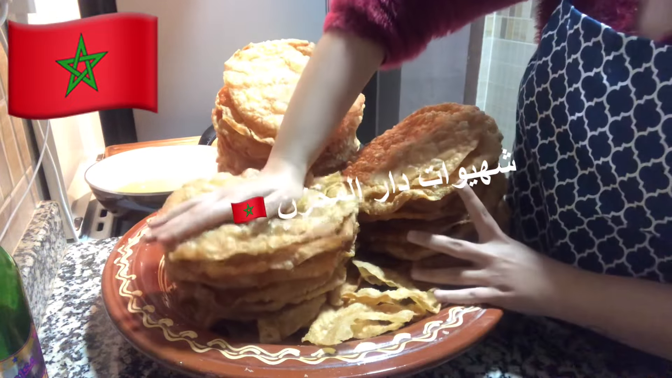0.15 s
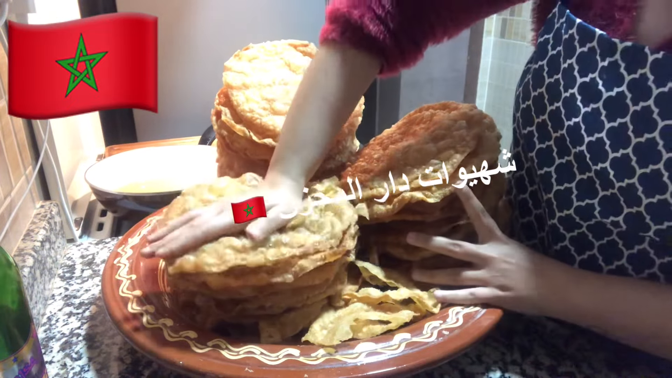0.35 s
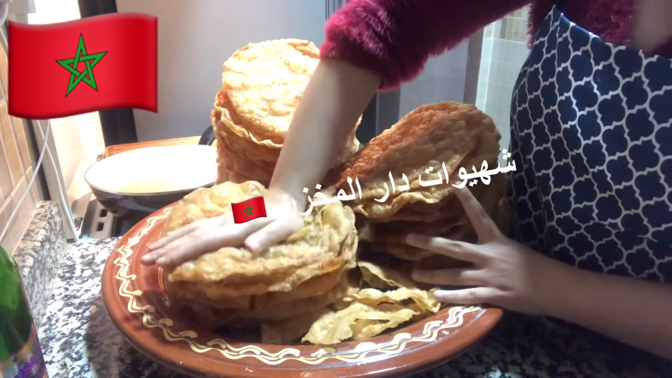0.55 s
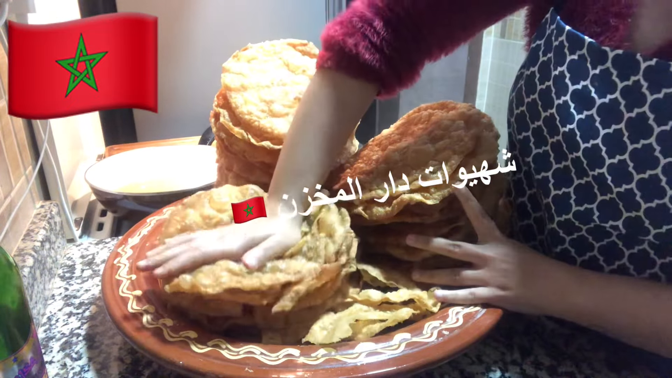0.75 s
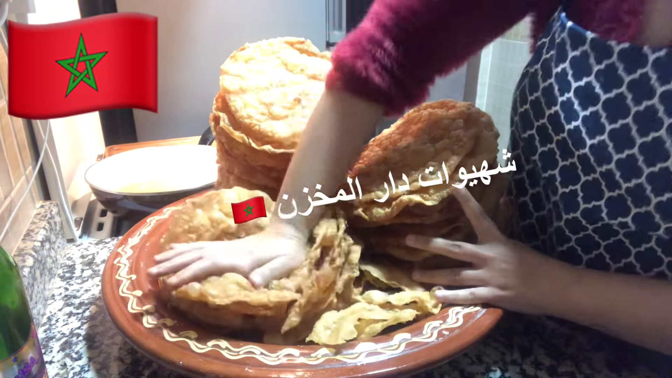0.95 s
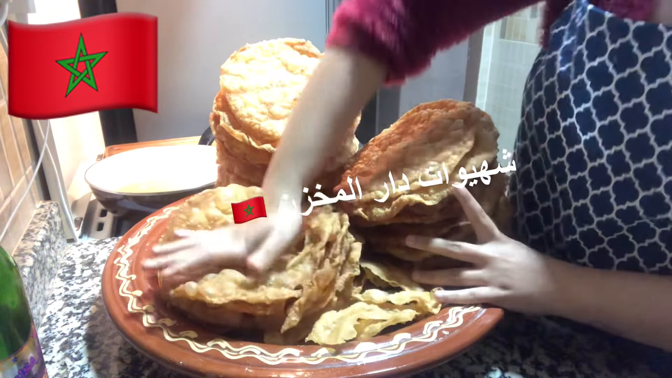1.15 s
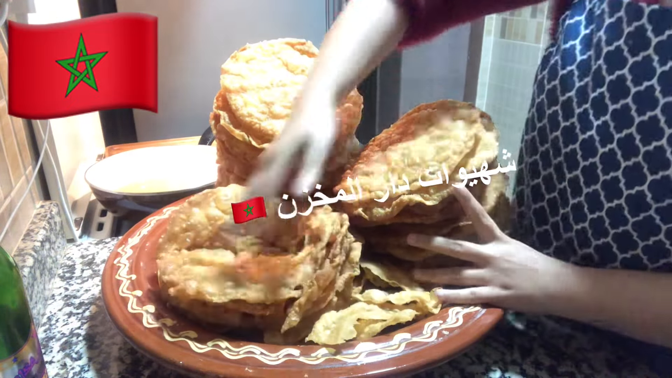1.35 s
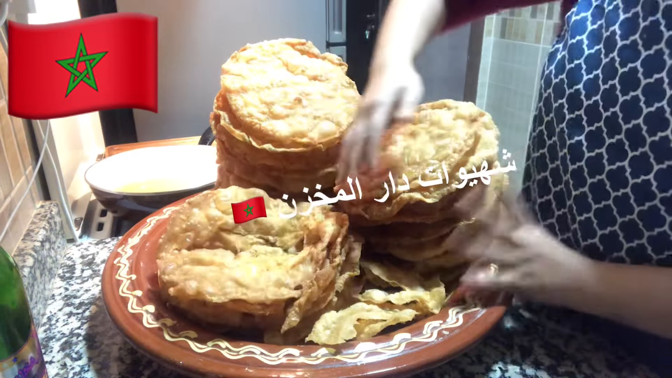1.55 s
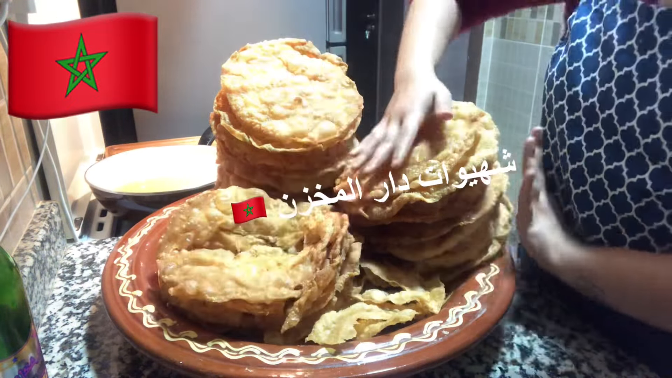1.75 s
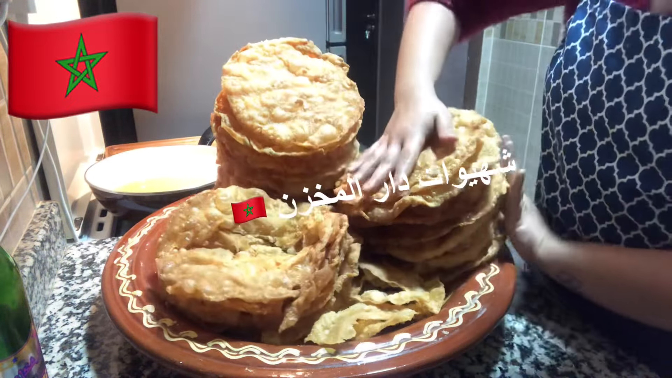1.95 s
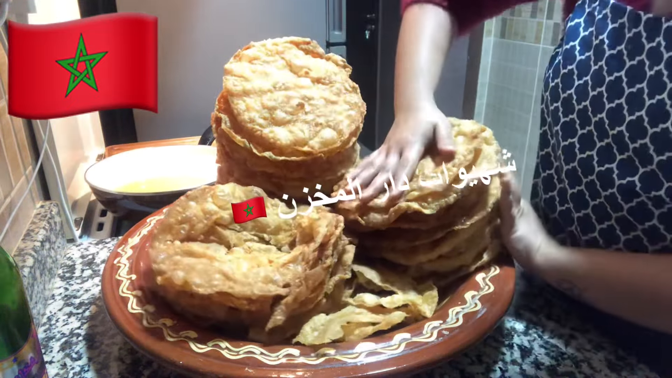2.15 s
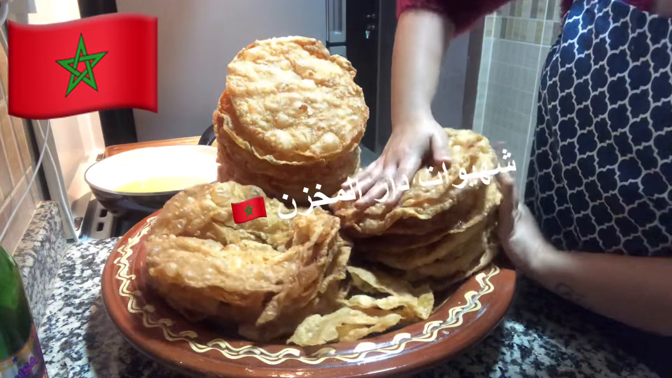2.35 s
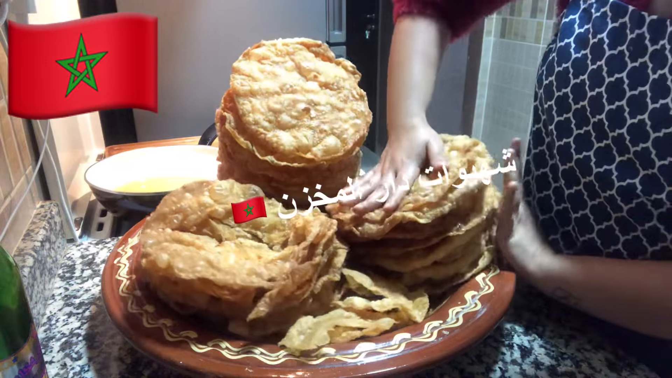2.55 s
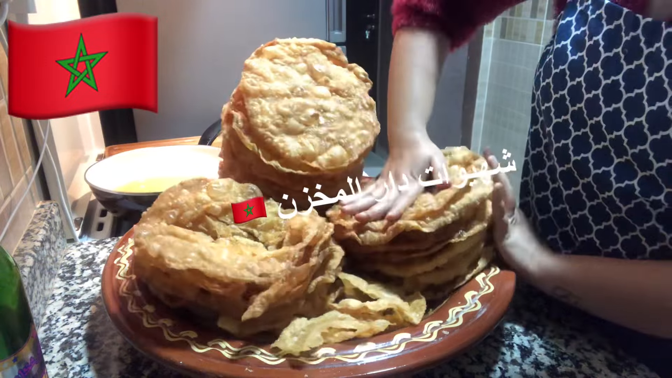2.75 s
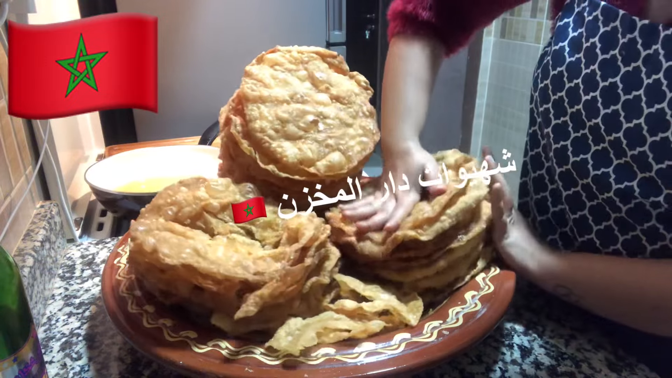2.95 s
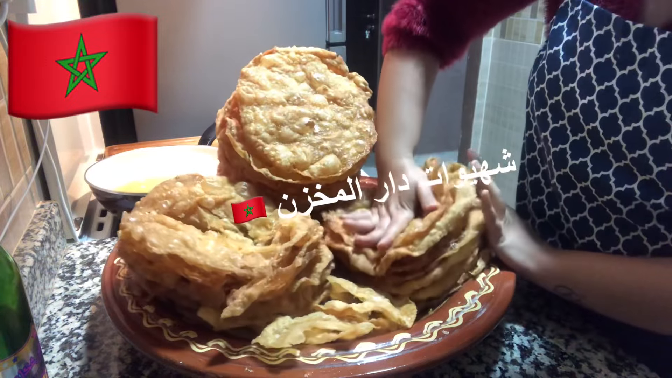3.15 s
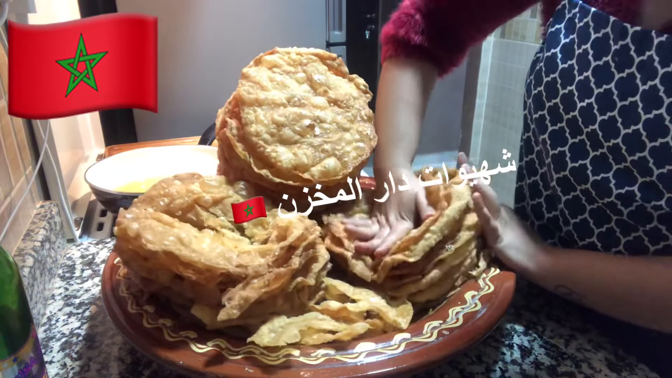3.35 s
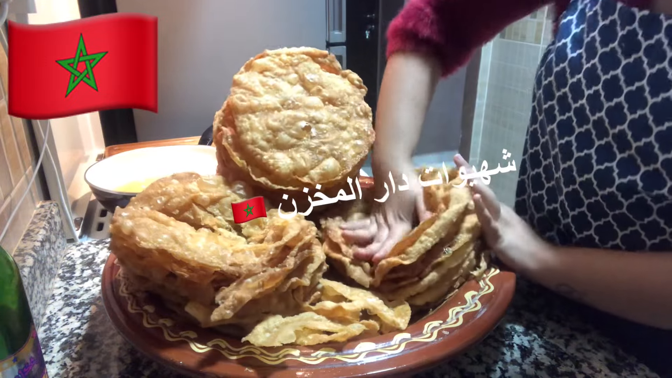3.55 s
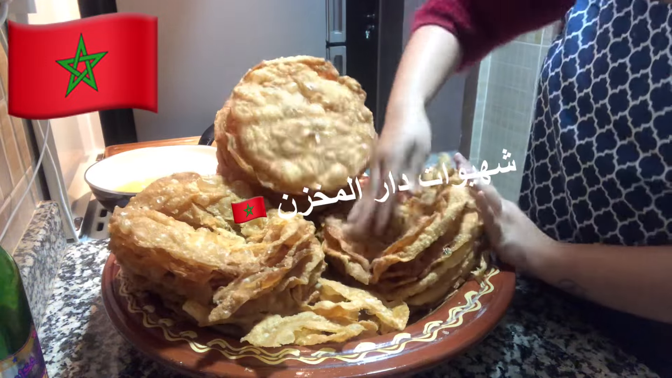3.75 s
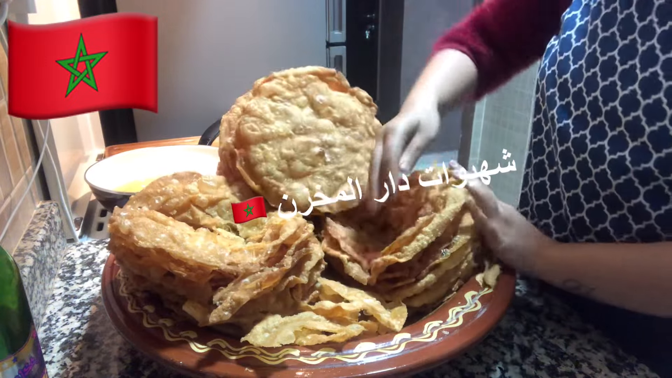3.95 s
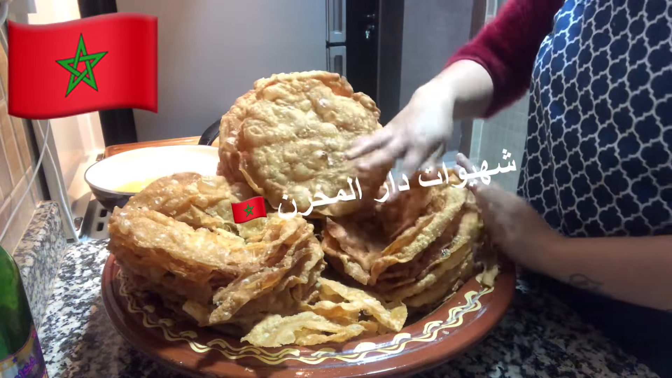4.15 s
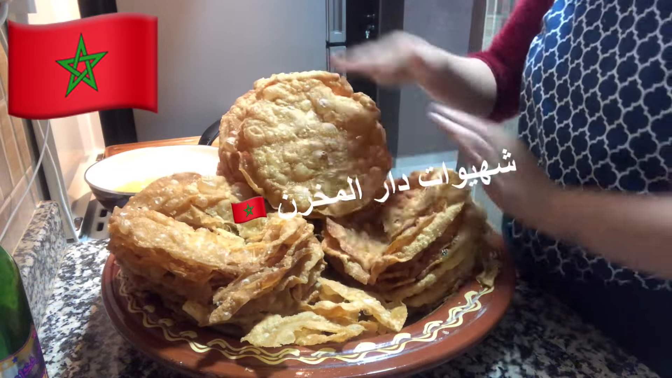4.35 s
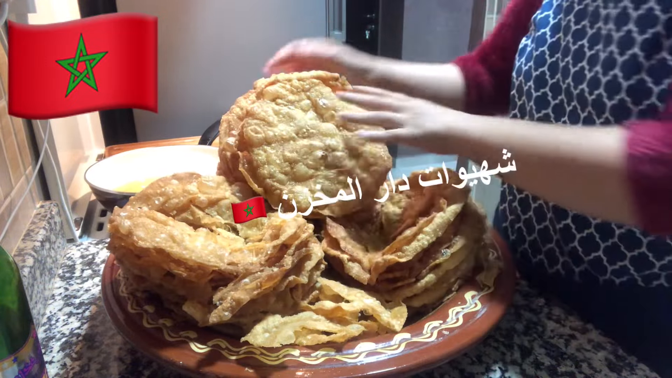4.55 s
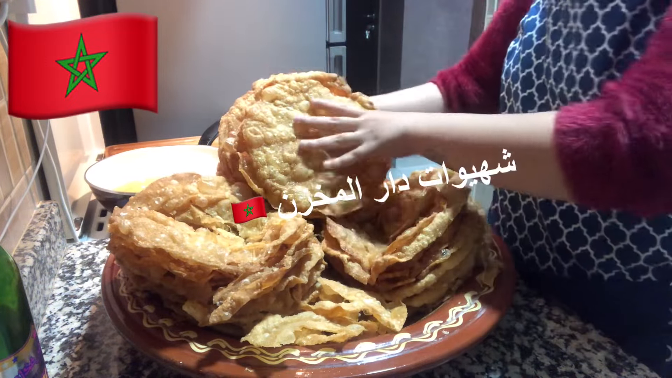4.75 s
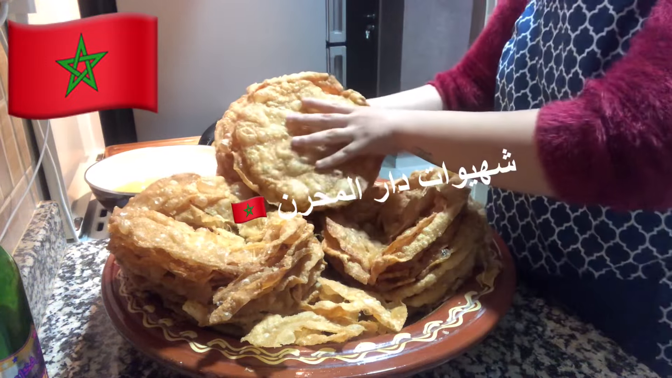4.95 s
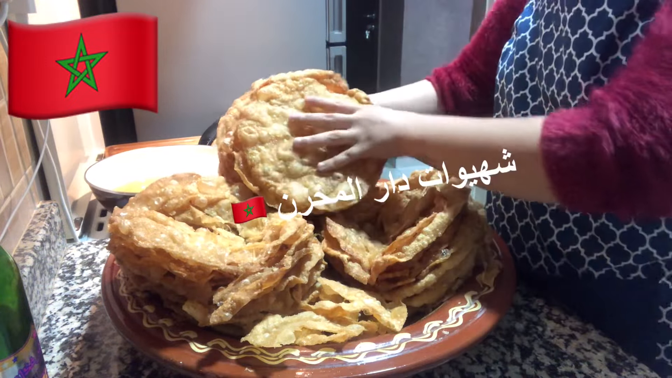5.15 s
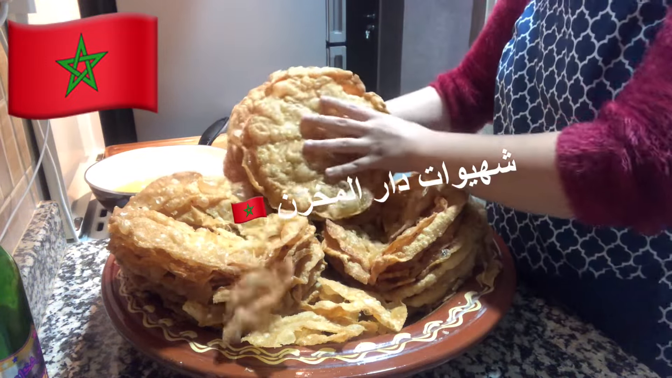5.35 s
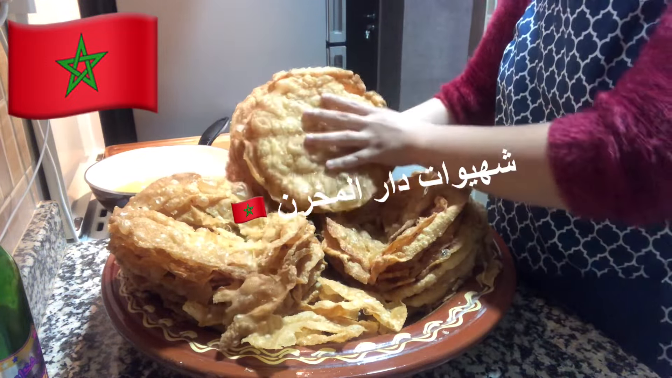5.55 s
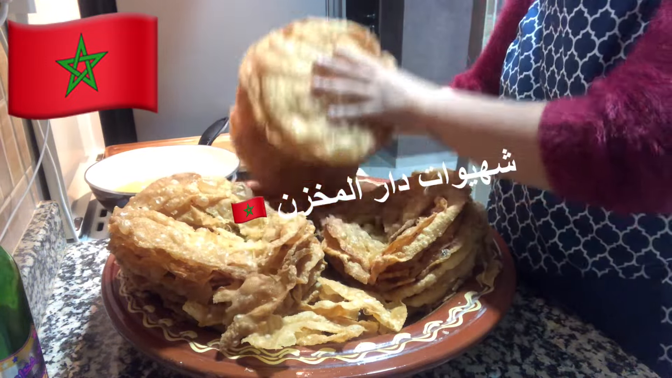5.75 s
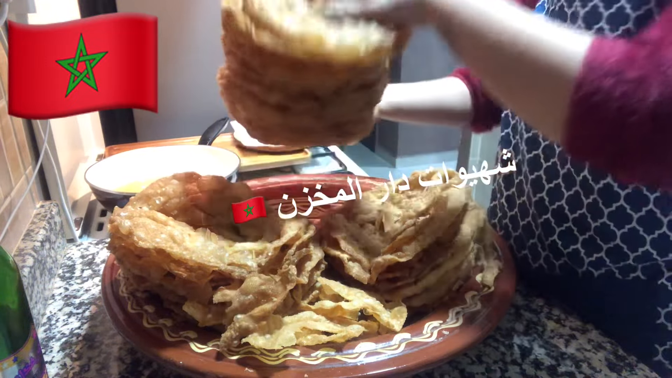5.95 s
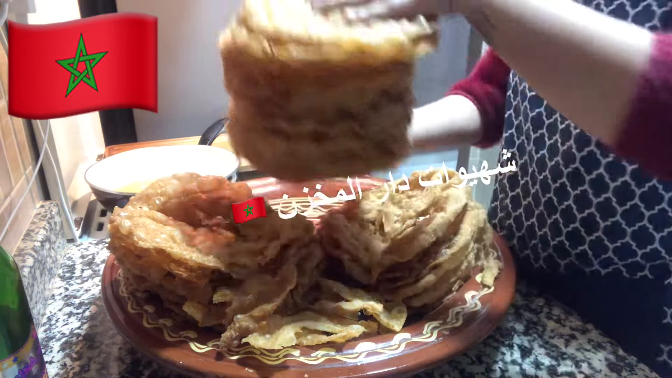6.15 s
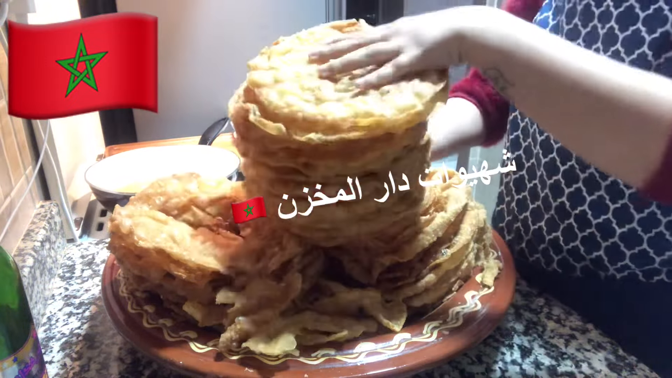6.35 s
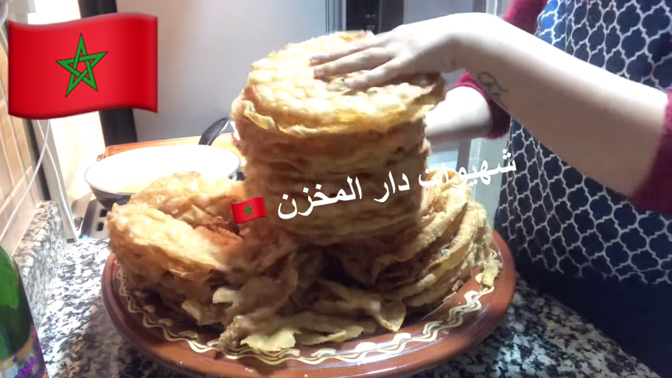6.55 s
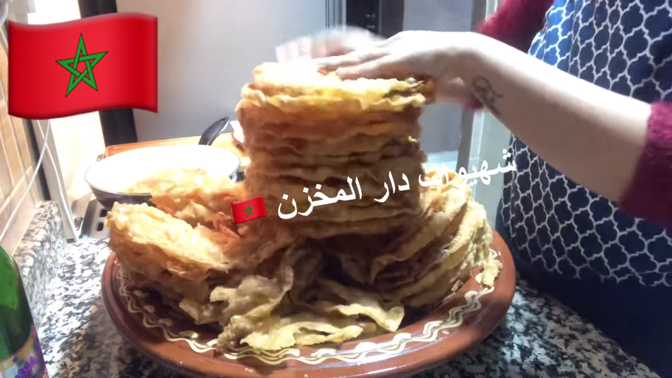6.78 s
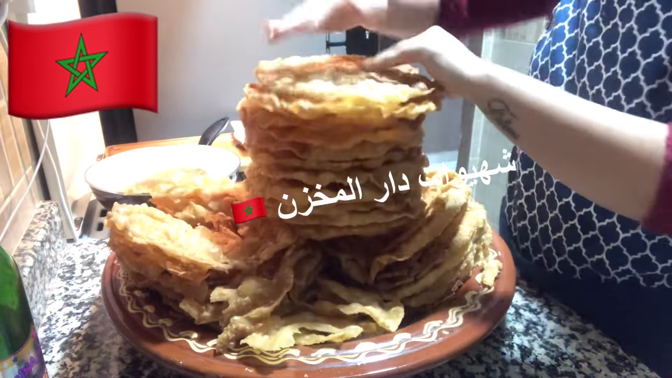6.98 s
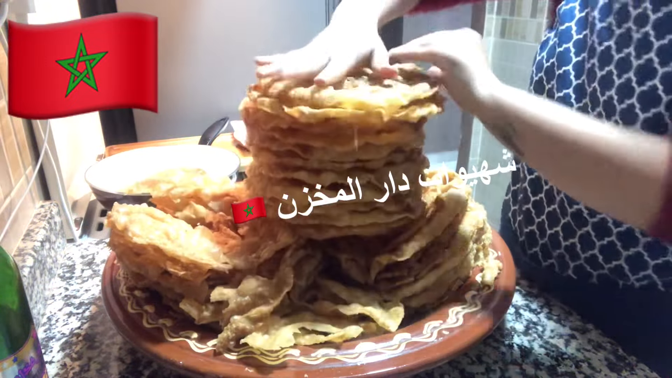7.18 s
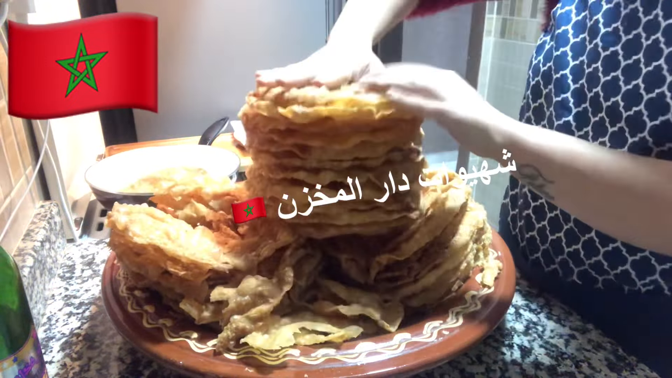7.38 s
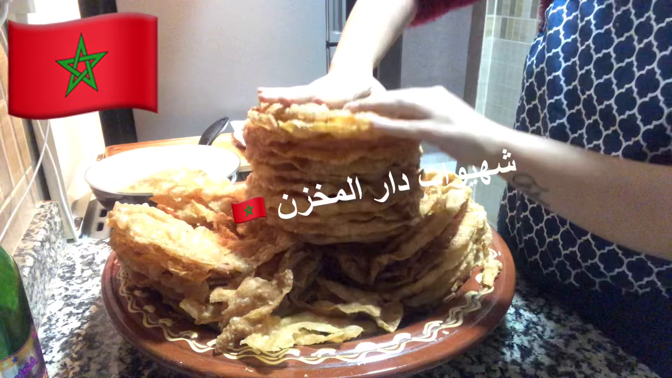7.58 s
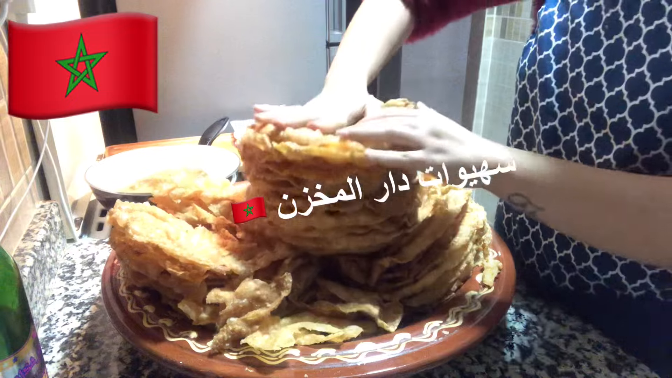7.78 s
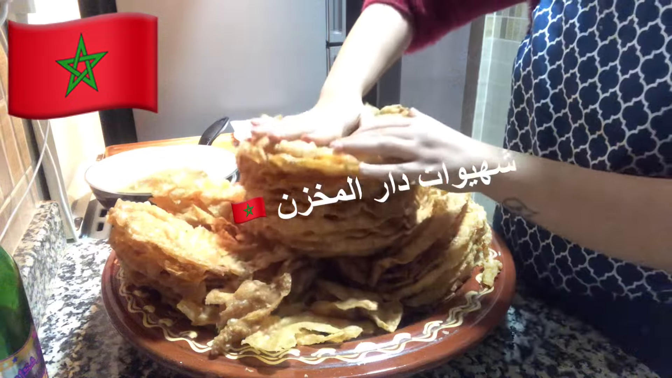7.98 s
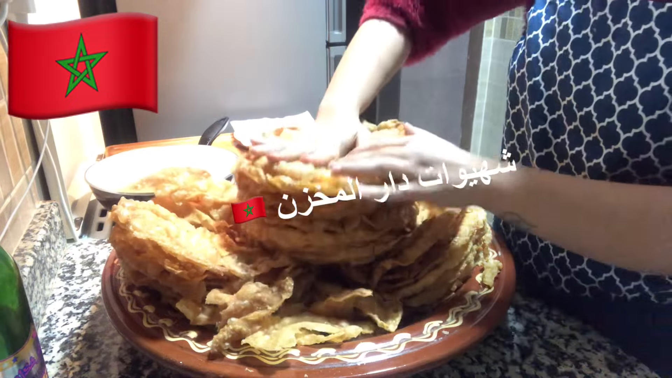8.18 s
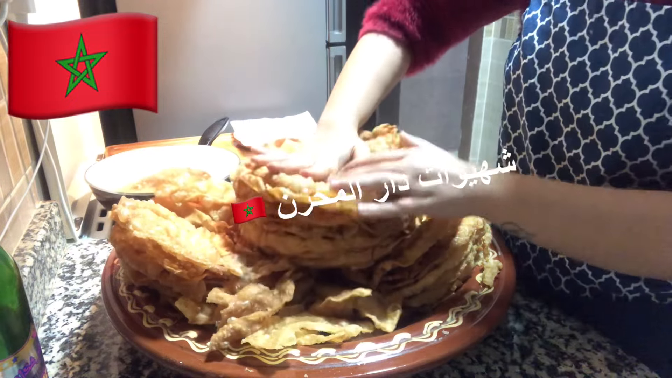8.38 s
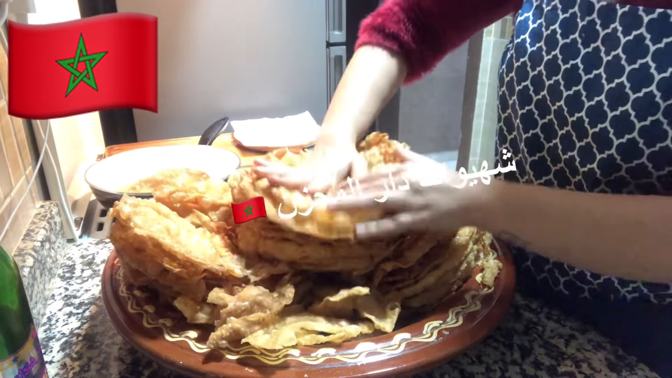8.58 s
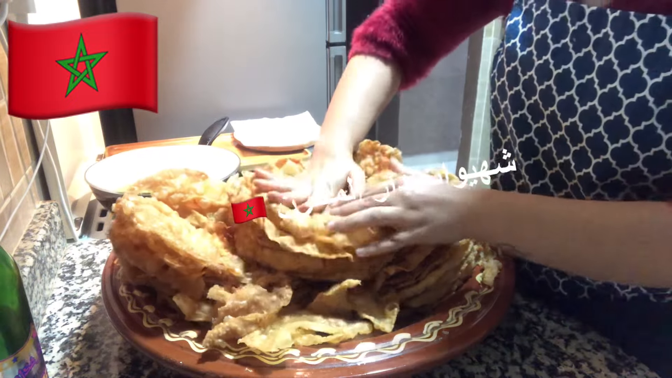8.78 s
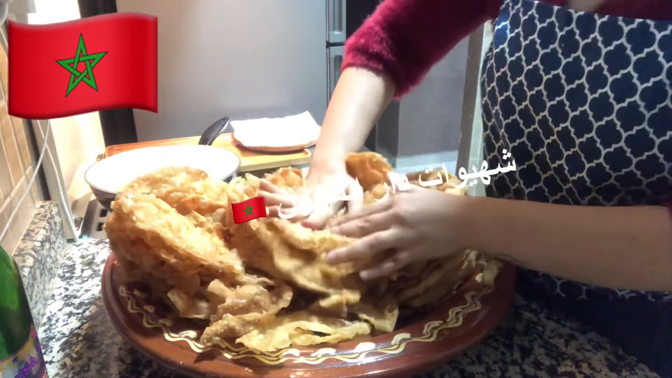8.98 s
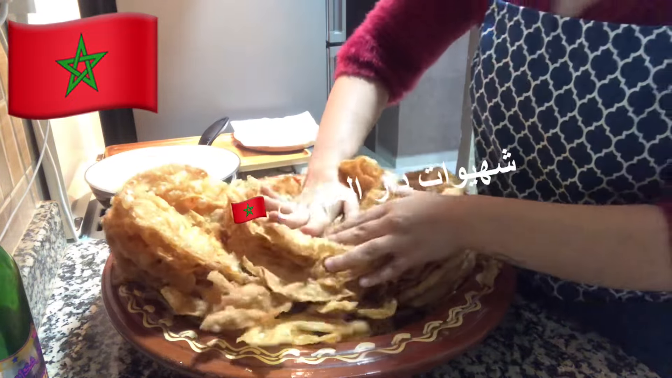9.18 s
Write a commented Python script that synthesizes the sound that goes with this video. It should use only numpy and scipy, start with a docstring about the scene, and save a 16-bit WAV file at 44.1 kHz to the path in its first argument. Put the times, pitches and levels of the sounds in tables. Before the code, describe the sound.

Loud brittle crunching of fried dough sheets in three presses, close up in a hard-walled kitchen, separated by sparse small crackles over soft appliance hum.

```python
"""Crushing crisp fried dough

Hands press and crush stacks of thin crisp fried dough on a platter in a tiled kitchen, close to a mono microphone.
The crackle is thousands of tiny fractures that ring small flakes; big breaks snap out of it as short rings
and a tick. The clay platter rings along, the walls send echoes back, the pressing rumbles through the
counter as slow noise, and an appliance hums as steady tones in the air noise of the room."""
import sys
import numpy as np
from scipy import signal
from scipy.fft import rfft, irfft
from scipy.io import wavfile
from scipy.ndimage import uniform_filter1d

SR = 44100
rng = np.random.default_rng(int(sys.argv[2]) if len(sys.argv) > 2 else 0)


def to_wav(s):
    """Save 16-bit WAV."""
    ch = np.atleast_2d(s).T  # columns
    pcm = np.round(np.clip(ch, -1, 1) * 32767)  # PCM
    wavfile.write(sys.argv[1], SR, pcm.astype(np.int16))


N = 406602  # length in samples

# How hard the dough crackles, one curve for each handling: t/s, crackle level/dB
FIRST_PRESS = [(0, -30), (.02, -31), (.034, -22), (.11, -21), (.155, -16), (.19, -20), (.24, -18.5),
               (.286, -28), (.302, -21), (.45, -19), (.62, -21), (.71, -22), (.79, -20), (.84, -16.5),
               (.915, -17.5), (.96, -38), (1.09, -41), (1.138, -43), (1.2, -57)]
SETTLING = [(1.21, -57), (1.3, -68), (1.312, -50), (1.345, -64), (1.385, -56), (1.414, -47), (1.45, -55),
            (1.512, -72), (1.79, -74)]
SECOND_PRESS = [(1.81, -62), (1.9, -43), (1.92, -35), (2.03, -37), (2.045, -31), (2.2, -31), (2.242, -24),
                (2.31, -22), (2.37, -26), (2.46, -24), (2.56, -27), (2.578, -19.5), (2.712, -20),
                (2.78, -32), (2.836, -24), (2.92, -19), (3.09, -24), (3.19, -20.5), (3.3, -29),
                (3.382, -21), (3.43, -21), (3.46, -40)]
LETTING_GO = [(3.51, -37.5), (3.613, -40), (3.65, -45), (3.735, -36), (3.762, -45), (3.85, -39),
              (3.92, -48), (3.97, -41), (4.06, -46), (4.185, -62), (4.3, -74), (4.378, -76), (4.388, -50),
              (4.43, -68), (4.69, -74)]
GRIPPING = [(4.7, -76), (4.707, -49), (4.83, -53), (4.89, -50), (4.9, -39), (4.93, -46), (4.98, -52),
            (5.012, -39), (5.05, -47), (5.13, -55), (5.145, -45), (5.17, -42), (5.3, -43), (5.35, -44),
            (5.39, -53), (5.455, -54), (5.466, -39), (5.52, -47.5), (5.58, -36), (5.65, -48), (5.8, -72)]
LIFTING = [(5.81, -72), (5.88, -60), (5.955, -62), (5.97, -52), (6.08, -60), (6.15, -66), (6.23, -62),
           (6.268, -70)]
SETTING_DOWN = [(6.275, -45), (6.32, -42), (6.35, -35), (6.362, -28), (6.38, -39), (6.46, -39), (6.54, -43),
                (6.62, -34), (6.73, -37), (6.76, -43), (6.91, -44), (6.95, -52), (7.1, -52), (7.16, -45),
                (7.3, -46)]
THIRD_PRESS = [(7.31, -46), (7.352, -32), (7.382, -34), (7.388, -25), (7.414, -30), (7.578, -19),
               (7.64, -25), (7.666, -18), (7.704, -22), (7.72, -18), (7.81, -26), (7.872, -20),
               (7.936, -25), (8.014, -18), (8.314, -22), (8.398, -18), (8.488, -26), (8.504, -20),
               (8.588, -18), (8.768, -27), (8.942, -18), (9.078, -28), (9.13, -26), (9.2, -28)]
HANDLINGS = [FIRST_PRESS, SETTLING, SECOND_PRESS, LETTING_GO, GRIPPING, LIFTING, SETTING_DOWN, THIRD_PRESS]
FIRM_PRESS_DB = -20.5  # crackle level of a firm press, the reference for the number of breaks and the rumble


def amp(db):
    """Turns a level in dB into a gain."""
    return 10 ** (np.asarray(db) / 20)


def evened(x):
    """Scales a signal to rms 1."""
    return x / np.sqrt(np.mean(x ** 2) + 1e-20)


def read(points, hz):
    """Reads a table of values over frequency, with the frequencies on a log axis."""
    f, value = np.transpose(points)
    return np.interp(np.log(hz + 1), np.log(f + 1), value)


def coloured(points):
    """Makes steady noise of rms 1 with the shape of the given spectrum."""
    spectrum = rfft(rng.standard_normal(N))
    gain = amp(read(points, np.fft.rfftfreq(N, 1 / SR)))
    return evened(irfft(spectrum * gain, N))


def drift(seconds):
    """Makes a slow random wander of rms 1 by averaging noise twice."""
    span = max(int(seconds * SR), 2)
    once = uniform_filter1d(rng.standard_normal(N), span)
    return evened(uniform_filter1d(once, span))


def ring(hz, cycles):
    """A flake struck once: it swells at once and dies within a few cycles; energy 1."""
    turns = np.arange(int(6 * cycles * SR / hz) + 4) * hz / SR
    swell = 1 - np.exp(-turns / 0.32)
    wave = np.sin(2 * np.pi * turns) * np.exp(-turns / cycles) * swell
    return wave / np.linalg.norm(wave)


def effort_db():
    """Crackle level through all handlings, sample by sample."""
    s, db = np.vstack(HANDLINGS).T
    return np.interp(np.arange(N) / SR, s, db)


def touch(index):
    """One column of the touch table, held through each handling and blended at the changes."""
    # how each handling sounds, in the order of HANDLINGS:
    # treble tilt/dB, low crunch tilt/dB, weight on the counter/dB (relative)
    touches = [(-6.5, -4.5, -27.5), (-7, -5.5, -25), (-5.5, -3, -26.5), (-8, -2, -25), (-7, 3.5, -25),
               (-9, -5.5, -23), (-5, -1, -26), (-5, -3.5, -27)]
    starts = [handling[0][0] for handling in HANDLINGS[1:]]
    now = np.searchsorted(starts, np.arange(N) / SR)
    return uniform_filter1d(np.array(touches, float)[now, index], size=2000)


def crackle(level_db):
    """Each fracture shakes a random few flakes; the harder the hand presses, the more fractures, up to a limit."""
    # colour of the crackle: f/Hz, relative level per Hz/dB
    flake_colour = [(150, -40), (250, -23.5), (360, -34), (466, -3), (683, 0.5), (758, -1.5), (917, -2.5),
                    (1390, 0.5), (4590, -1), (15700, -5.5)]
    most_per_s, thinning = 6000, .18  # thinning: dB of fracture rate per dB of crackle
    spread_db, clump_db, surge_db, patchy_db = 3.5, 1.39, .6, 1.0
    share = .1  # chance that a fracture shakes flakes of one size
    cycles, lean = 3.7, .23  # ring at 3500 Hz; part of the low tilt felt there

    busy = np.clip(amp(thinning * (level_db - FIRM_PRESS_DB)), .05, 1)
    breaks = rng.random(N) < busy * most_per_s / SR
    strength = amp(spread_db * np.minimum(rng.exponential(1, N), 4))
    clumps = amp(clump_db * drift(0.0064) + surge_db * drift(.018))
    breaks = breaks * strength * clumps / np.sqrt(busy)

    treble_db, low_db = touch(index=0), touch(index=1)
    dull, bright = drift(0.02), drift(0.014)
    out, power = np.zeros(N), 0
    for hz in np.geomspace(350, 15200, num=44):
        picked = rng.random(N) < share
        shaken = evened(breaks * picked * rng.choice([-1., 1.], N))
        octave = np.log2(hz / 3500)
        # the touch shifts the balance towards small bright or large dull flakes
        tilt_db = treble_db * np.clip(octave - .6, 0, 1) + low_db * np.clip(lean - 0.56 * octave, 0, 1.2)
        # flakes of similar size tend to sound loud together
        patch_db = patchy_db * (np.cos(2.16 * octave) * dull + np.sin(1.84 * octave) * bright)
        weight = amp(read(flake_colour, hz)) * np.sqrt(hz)
        # small flakes tend to ring for more cycles
        flake = ring(hz, cycles * 2 ** (0.33 * octave + rng.uniform(-.5, .5)))
        out += weight * signal.oaconvolve(shaken * amp(level_db + tilt_db + patch_db), flake)[:N]
        # the flakes from 2 to 7 kHz set the overall level
        power += weight ** 2 * (2000 < hz < 7000)
    return out / np.sqrt(power)


def snaps():
    """A sheet breaks: its pieces ring at uneven pitches as the crack slips on, and a tick adds treble."""
    # single breaks: t/s, peak level/dB, flake pitch f/Hz, treble level/dB (relative)
    big_breaks = [(.023,-1,3150,-10),(.049,-9,1900,-14),(.103,-2,5600,-20),(.12,-5,2470,-12),(.228,-7,2610,-15),(.3,-5,2000,-10),(.415,-4,3780,-15),(.517,-6,2700,-16),(.583,-9,4560,-6),(.673,-6,3330,-13),(.733,-3,3850,-14),(.789,0,2600,-18),(.959,-16,5030,-15),(1.044,-25,5920,-12),(1.07,-23,5700,-9),(1.091,-24,2750,-15),(1.214,-42,3990,-16),(1.232,-41,3210,-10),(1.307,-29,6650,-12),(1.327,-37,6610,-14),(1.36,-35,4290,-10),(1.383,-41,7190,-15),(1.399,-36,2670,-18),(1.491,-41,4500,-14),(1.574,-41,4360,-12),(1.613,-43,6000,-11),(1.796,-45,6650,-13),(1.825,-38,3200,-12),(1.84,-35,2040,-12),(1.847,-37,2900,-11),(1.877,-30,1660,-5),(1.911,-17,6440,-8),(1.93,-23,1280,-10),(1.986,-22,1210,-12),(2.038,-23,1280,-12),(2.044,-19,1300,-15),(2.062,-11,4530,-21),(2.082,-14,4600,-14),(2.125,-6,4970,-18),(2.149,-14,1420,-9),(2.229,-12,3230,-15),(2.235,-11,3870,-26),(2.305,-10,6080,-14),(2.328,-8,2860,-12),(2.391,-13,4310,-13),(2.438,-4,4800,-4),(2.479,-5,5370,-11),(2.524,-7,2650,-11),(2.577,-3,4380,-18),(2.603,-6,2750,-3),(2.791,-18,7000,-11),(2.813,-4,2880,-13),(3.061,-12,3000,-13),(3.177,-9,3800,-13),(3.333,-10,5300,-14),(3.373,-3,7300,-11),(3.522,-30,1630,-13),(3.577,-31,4560,-14),(3.684,-24,1800,-18),(3.722,-21,2370,-19),(3.738,-24,3050,-21),(3.8,-29,1430,-17),(4.111,-34,3020,-4),(4.172,-42,3150,-14),(4.384,-36,1430,-8),(4.664,-43,4730,-3),(4.706,-26,1550,-20),(4.732,-33,800,-17),(4.774,-37,3770,-13),(4.784,-33,4730,-6),(4.834,-38,1210,-11),(4.855,-32,3780,-14),(4.878,-36,3930,-12),(4.896,-16,4100,-14),(4.898,-19,2150,-18),(5.004,-26,1210,-12),(5.011,-26,1240,-12),(5.141,-30,1040,-13),(5.256,-35,780,-22),(5.279,-20,1190,-22),(5.314,-22,1250,-14),(5.426,-30,1650,-16),(5.461,-24,1410,-15),(5.501,-27,3230,-21),(5.539,-25,1760,-18),(5.568,-22,1610,-14),(5.586,-18,3740,-17),(5.64,-29,2950,-15),(5.856,-43,4690,-15),(5.915,-47,5470,-8),(5.931,-48,1400,-3),(5.964,-31,5060,-10),(5.992,-38,1890,-20),(6.014,-43,1800,-16),(6.046,-35,2040,-17),(6.073,-41,3760,-7),(6.112,-44,3220,-12),(6.14,-34,5100,-8),(6.186,-48,1770,-13),(6.212,-45,1650,-12),(6.234,-36,5130,-12),(6.274,-33,1440,-12),(6.284,-30.5,3800,-13),(6.304,-31,4390,-14),(6.326,-23,4350,-11),(6.339,-18,7800,-9),(6.357,-8,4060,-9),(6.362,-16,1400,-20),(6.546,-28,1380,-7),(6.616,-19,2000,-4),(6.652,-23,1480,-8),(6.702,-26,1430,-14),(6.722,-19,3670,-23),(6.734,-19,3550,-25),(6.812,-21,3920,-20),(6.838,-31,3890,-18),(6.89,-26,2360,-15),(7.01,-33,3260,-14),(7.128,-34,1460,-14),(7.147,-30,2770,-7),(7.166,-26,5800,-17),(7.276,-24,4830,-14),(7.279,-30,1350,-20),(7.322,-24,3920,-12),(7.34,-20,3300,-14),(7.352,-18,2060,-2),(7.389,-14,1400,-8),(7.436,-12,4020,-16),(7.467,-16,1100,-11),(7.535,-8,1730,-15),(7.668,-3,4950,-18),(7.825,-8,1730,-3),(7.862,-2,1700,-5),(7.986,-6,6370,-15),(8.016,-2,3800,-8),(8.327,-4,3350,-16),(8.506,-3,6130,-16),(8.534,-8,2150,-13),(8.874,-8,5030,-16)]
    # pieces of one sheet: pitch ratio, level/dB (relative)
    pieces = [(1.004, 0.0018), (0.61, -13), (1.45, -3), (2.22, -3)]
    cycles, splinter_db, slips_per_s = 2.63, -6, 2000
    full_t60_s, t60_s_per_db = .03, .02  # dying time of a 0 dB break, and its change with peak level

    out, t = np.zeros(N + SR), np.arange(3500) / SR
    chance = rng.standard_normal((len(big_breaks), 3, len(t)))
    slips = rng.random((len(big_breaks), 4, len(t)))
    high = signal.butter(2, [5000, 13000], "band", fs=SR)
    for (s, peak_db, hz, treble_db), (force, hiss, uneven), slip in zip(big_breaks, chance, slips):
        # only the loudest breaks splinter for longer than the 5 ms floor
        dying = amp(-60 * t / np.clip(full_t60_s + t60_s_per_db * peak_db, .005, .3))
        grit = amp(2.4 * evened(uniform_filter1d(uneven, 30)))
        sound = amp(treble_db) * dying * evened(signal.lfilter(*high, hiss) * grit)
        for k, (ratio, db) in enumerate(pieces):
            # every piece but the first is randomly mistuned
            pitch = hz * ratio * 2 ** (.12 * uneven[k] * (k > 0))
            wave = ring(min(pitch, 15000), cycles)
            blows = amp(splinter_db) * dying * force * (slip[k] < slips_per_s / SR)
            blows[0] = 1  # the first crack
            sound += amp(db) * signal.fftconvolve(blows, wave / abs(wave).max())[:len(t)]
        out[round(s * SR):][:len(t)] += amp(peak_db) * sound / abs(sound).max()
    return out[:N]


def platter(x):
    """The clay dish under the dough rings briefly with every break."""
    # ringing tones of the clay: f/Hz, level/dB (relative), time to fall 60 dB t/s
    clay_modes = [(567, -9, 0.058), (789, -14, 0.028), (1235, -16, 0.12), (1536, -10.5, 0.075),
                  (2106, -11, 0.03)]
    t = np.arange(4000) / SR
    ringing = np.zeros(len(t))
    for hz, db, t60 in clay_modes:
        mode = amp(-60 * t / t60) * np.sin(2 * np.pi * hz * t)
        ringing += amp(db) * mode / np.linalg.norm(mode) / 20
    return signal.oaconvolve(x, ringing)[:N]


def kitchen(x, count=8):
    """Sparse echoes from hard walls, each band dying at its own speed; 5 ms slices get one of a few patterns."""
    # how long echoes last: f/Hz, time to fall 60 dB t/s
    echo_times = [(300, 0.2), (1500, 0.19), (5000, 0.19), (14000, 0.22)]
    # a random choice of pattern for each slice stands for breaks at different spots on the platter
    spot = (rng.random(N // 220 + 1) * count).astype(int).repeat(220)[:N]
    at, wet = np.arange(120, SR // 2, 20), np.zeros(N)
    for k in range(count):
        taps = np.zeros(SR // 2 + 20)
        taps[at + rng.integers(0, 20, len(at))] = rng.choice([-1., 1.], len(at))
        hz, t, bands = signal.stft(taps, SR, nperseg=256)
        dying = amp(-60 * t / read(echo_times, hz)[:, None])
        tail = signal.istft(bands * dying, SR, nperseg=256)[1]
        wet += signal.oaconvolve(x * (spot == k), tail / np.linalg.norm(tail))[:N]
    return wet


def rumble(level_db):
    """The push of the hands shakes platter and counter: low noise follows the crackle, late and in lurches."""
    # colour of the rumble: f/Hz, relative level per Hz/dB
    counter_colour = [(30, -11), (50, -17), (65, 2), (82, -7), (104, 6.5), (125, -5), (200, -9),
                      (245, -1.5), (290, -1.5), (370, -24), (500, -36.5)]
    push_per_db, lag_s = 0.87, 0.067
    lurch_db, lurch_s = 3.5, .04
    press_db = push_per_db * (level_db - FIRM_PRESS_DB)
    push = amp(touch(index=2) + press_db - 20 + lurch_db * drift(lurch_s))
    # smoothing makes the counter respond late
    keep = np.exp(-1 / (lag_s * SR + 1))
    return signal.lfilter([1 - keep], [1, -keep], push) * coloured(counter_colour)


def room_tone():
    """Steady air noise and the tones of an appliance, slightly wavering in level."""
    # colour of the air noise: f/Hz, relative level per Hz/dB
    air_colour = [(30, -29), (70, -24.5), (100, -1.5), (125, -7.5), (250, -7), (500, -17.5), (1500, -25),
                  (6000, -35.5), (15500, -52.5)]
    # appliance tones: f/Hz, rms level/dB
    hum_tones = [(396.4, -59.5), (99.6, -71.5), (450, -75)]
    air_db = -61.5  # rms
    t = np.arange(N) / SR
    tones = np.zeros(N)
    for hz, db in hum_tones:
        loudness = np.sqrt(2) * amp(db + .8 * drift(.1))
        tones += loudness * np.sin(2 * np.pi * (hz * t + rng.random()))
    return tones + amp(air_db) * coloured(air_colour)


def scene():
    """Dough, dish, their echoes, the counter and the room, alike in both channels."""
    level_db = effort_db()
    dough = crackle(level_db) + snaps()
    dough = dough + platter(dough)
    echoes = amp(-5.5) * kitchen(dough)
    return np.tile(dough + echoes + rumble(level_db) + room_tone(), (2, 1))


def record(dry):
    """The microphone drops the deep bass, loud peaks round off, then the top treble is cut."""
    edge_hz = 15760
    bass_cut = signal.butter(5, 54, "high", fs=SR, output="sos")
    thin = signal.sosfilt(bass_cut, dry)
    rounded = .85 * np.tanh(thin / .85)
    treble_cut = signal.firwin(801, edge_hz, window=("kaiser", 9), fs=SR)
    return signal.oaconvolve(rounded, treble_cut[None], "same")


dry = scene()
out = record(dry)
to_wav(out)
```